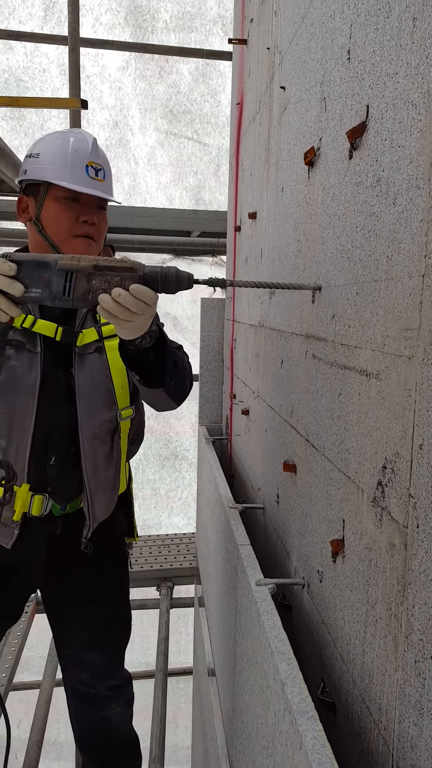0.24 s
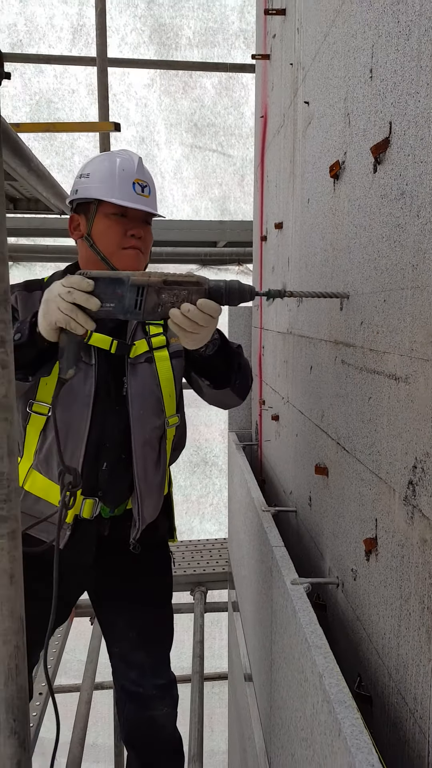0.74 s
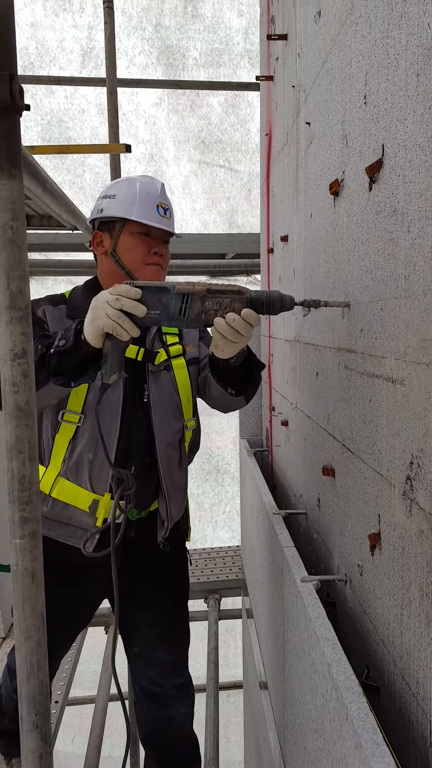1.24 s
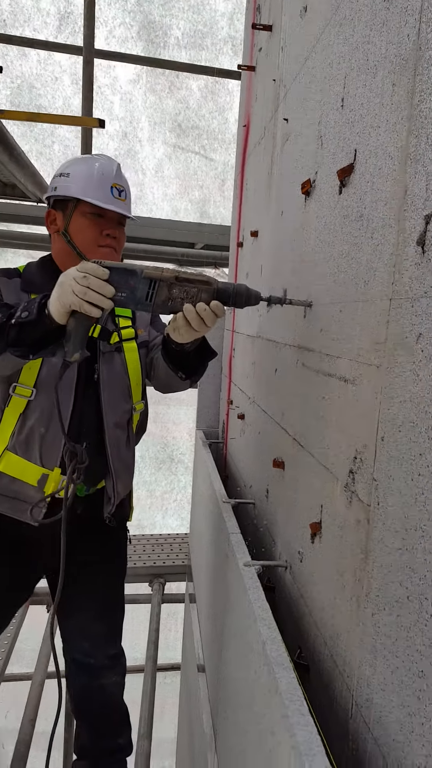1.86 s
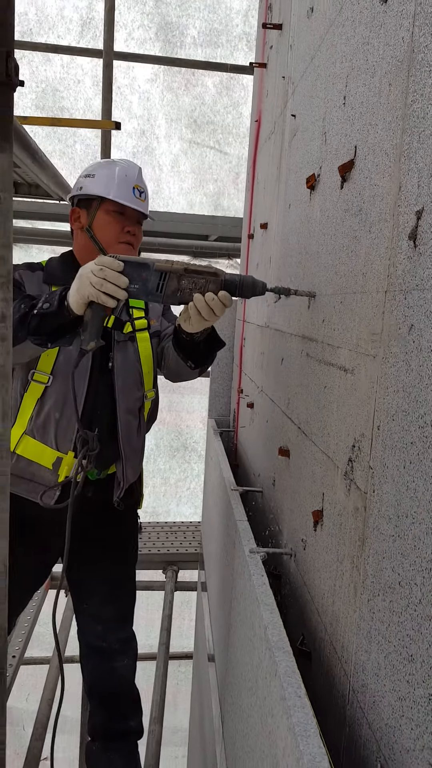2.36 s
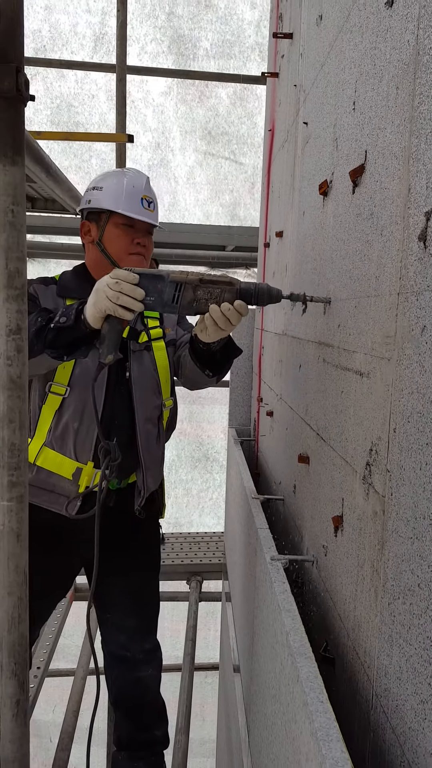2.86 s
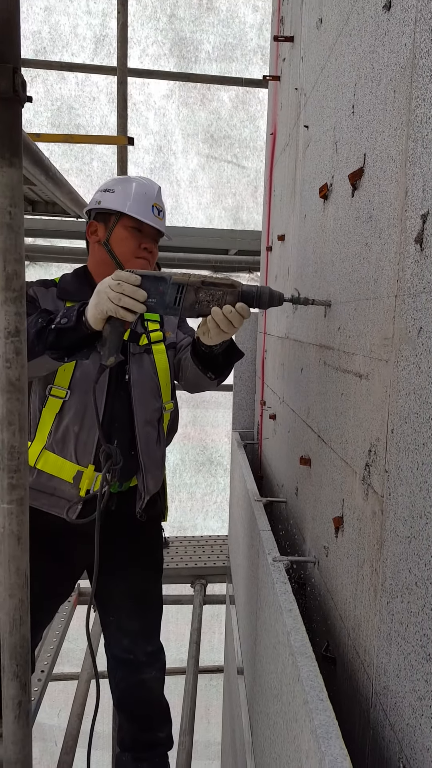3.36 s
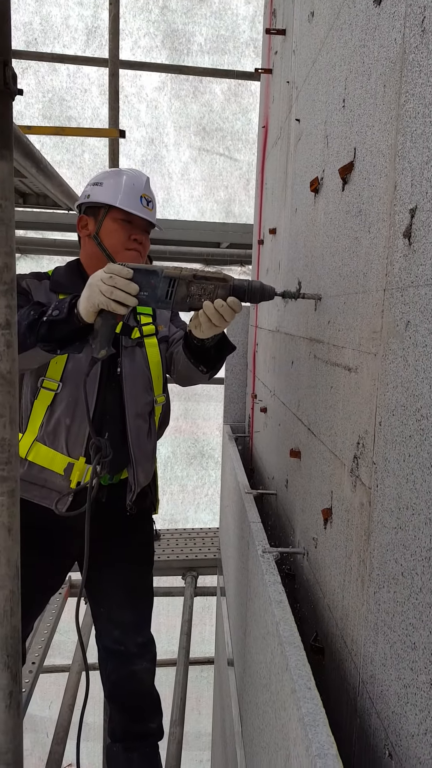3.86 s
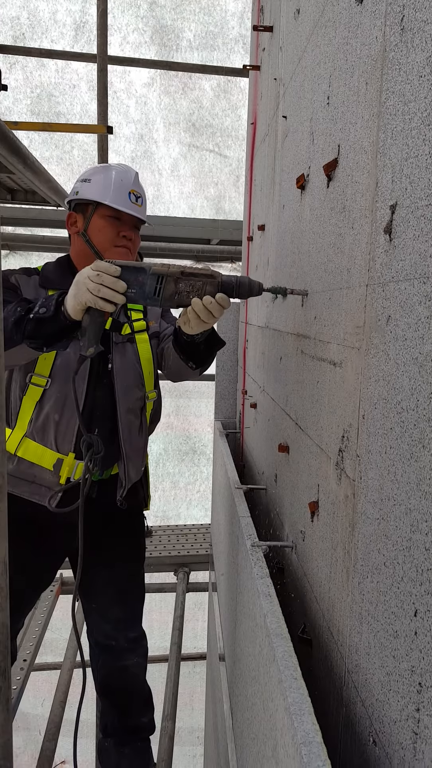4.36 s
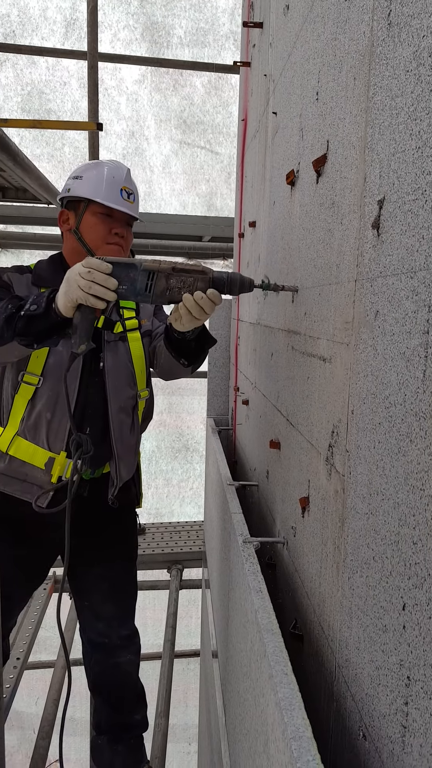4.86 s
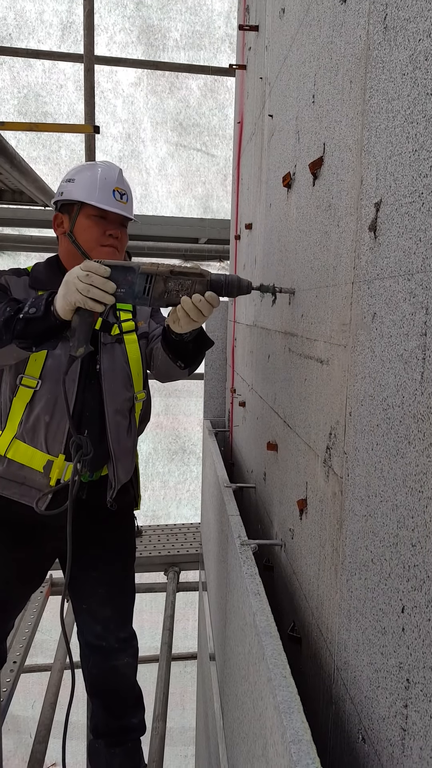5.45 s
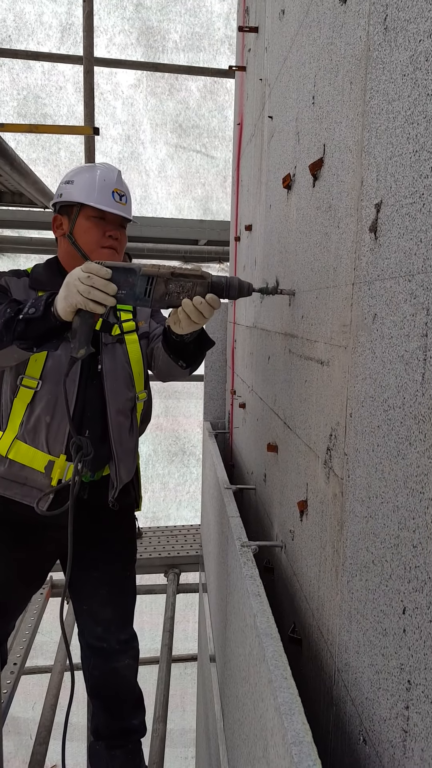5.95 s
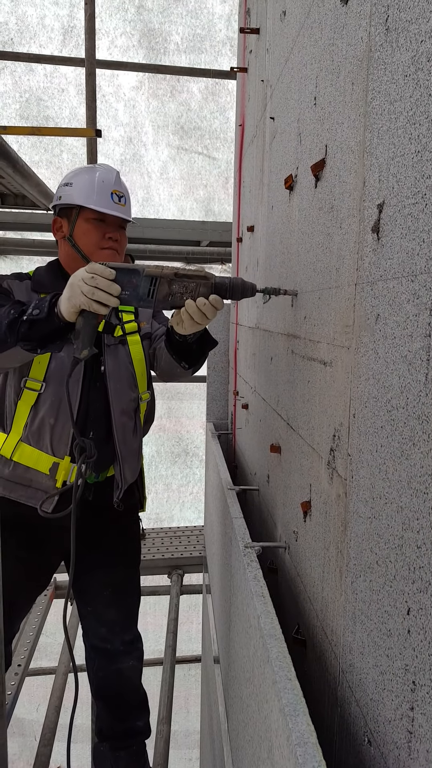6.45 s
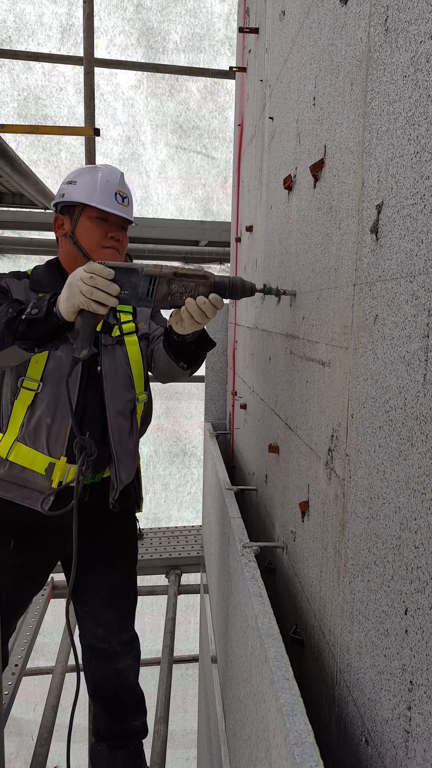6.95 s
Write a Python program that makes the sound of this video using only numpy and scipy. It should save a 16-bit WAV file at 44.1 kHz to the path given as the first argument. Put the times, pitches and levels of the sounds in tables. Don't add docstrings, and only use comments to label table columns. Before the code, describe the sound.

On a building scaffold, a phone two metres off picks up nonstop hammer drilling in stereo. First a hollow, midrange housing rattle while the bit passes through foam, then a short high squeal and a jump to a sharp, hissing, ringing hammer against stone. The rate slows, settles and deepens slightly. Wooden boards knock within the noise, faint wind puffs pass, and steel squeaks near the end.

```python
import sys
import numpy as np
from scipy import signal
from scipy.fft import rfft, irfft, next_fast_len
from scipy.io import wavfile
from scipy.ndimage import uniform_filter1d

SR = 44100
rng = np.random.default_rng(int(sys.argv[2]) if len(sys.argv) > 2 else 0)


def linear_from_db(decibels):
    return 10 ** (np.asarray(decibels, float) / 20)


def dump_mix(stems):
    frames = np.atleast_2d(stems).T
    limited = np.clip(frames, -1, 1)
    pcm = np.round(limited * 32767).astype(np.int16)
    wavfile.write(sys.argv[1], SR, pcm)


N = 317961
T, M = np.arange(N) / SR, next_fast_len(N)
F = np.arange(M // 2 + 1) * SR / M
PORT_LAG = 7


def curves(table):
    s, *columns = np.transpose(table)
    return [np.interp(T, s, c) for c in columns]


def unit(x):
    return x / np.sqrt(np.mean(x ** 2))


def walk(rate):
    k = int(SR / rate)
    held = np.repeat(rng.standard_normal(N // k + 1), k)
    return 1.3 * uniform_filter1d(uniform_filter1d(held, k), k)[:N]


def band(lo_hz, hi_hz, edge_hz=180):
    share = (np.tanh((F - lo_hz) / edge_hz) - np.tanh((F - hi_hz) / edge_hz)) / 2
    if lo_hz == 0:
        share = share + (1 - np.tanh(F / edge_hz)) / 2
    return share


def colour(pair):
    gains = []
    for table in pair:
        hz, db = np.transpose(table)
        gains.append(linear_from_db(np.interp(np.log(F + 1), np.log(hz), db)))
    return np.array(gains)


def resonances(modes):
    gain = 1
    for hz, width, left_db, right_db in modes:
        peak = linear_from_db(np.array([[left_db], [right_db]])) - 1
        gain = gain * (1 + peak / (1 + (2 * (F - hz) / width) ** 2))
    return gain


def ports(shared, likeness, own):
    both = np.array([shared, np.roll(shared, PORT_LAG)])
    return np.sqrt(likeness) * both + np.sqrt(1 - likeness) * own


TOUCH_S, STONE_S = (0.93, 1.16), (1.23, 1.273)
SETTLE_S, DEEP_S = (1.74, 2.56), (3.24, 4.16)


def stages(values):
    return np.interp(T, TOUCH_S + STONE_S + SETTLE_S + DEEP_S, np.repeat(values, 2)[1:-1])


# t/s, f/Hz
BLOW_RATE = [(0, 83.4), (.5, 82.5), (.75, 81.6), (.95, 79.5), (1.25, 77.4), (1.38, 74.4), (1.5, 71.2),
             (1.63, 70.3), (2, 69.2), (2.5, 69.5), (3.25, 69.3), (3.75, 68.4), (4.2, 67.7), (4.6, 68.3),
             (5.1, 67.9), (5.75, 68.2), (6.1, 67.7), (7.21, 67.8)]


def piston():
    rate, = curves(BLOW_RATE)
    return np.cumsum(rate * (1 + .002 * walk(25))) / SR + .33


def blows(turns, rebounds, decay, rise_s=.0005):
    size = linear_from_db(rng.standard_normal((int(turns[-1]) + 2, 3)))
    power = 0
    for k, (late, share) in enumerate(zip((0, 0.23, 0.5), (1, *rebounds))):
        p = turns + 1 - late
        power = power + share * size[p.astype(int), k] * np.exp(-(p % 1) / decay)
    power = uniform_filter1d(power, size=max(int(rise_s * SR), 1))
    return power / uniform_filter1d(power, size=4000)


# from t/s, to t/s, from f/Hz, to
# f/Hz, width f/Hz, left level/dB, right level/dB
SLIDES = [(-0.3, 0.55, 5000, 4800, 400, 1.5, 4.5), (0.3, 1.4, 4300, 4450, 450, 0, 4),
          (-.1, 0.18, 3200, 2900, 200, 4, -4), (0.7, 1.05, 1750, 1800, 250, 2, 1.5),
          (-0.5, 1.3, 2700, 2400, 300, 6, 4.5), (0, 0.42, 2200, 1900, 680, -1.5, -5),
          (4.5, 1.85, 6200, 6200, 630, 12, 12), (1.3, 2.6, 6250, 6600, 450, 4.5, 1),
          (-3, 7.3, 8600, 8250, 350, 4.5, 2.5), (0.8, 7.3, 9150, 8600, 220, -2, -3),
          (1.3, 2.0, 13300, 15500, 900, 4, 0), (1, 1.62, 2600, 2900, 450, -6, -9),
          (5, 5.2, 4200, 3800, 1300, -2, -1), (6, 7.3, 354, 410, 99, 3.5, 1.5),
          (1.3, 1.26, 900, 1300, 260, -6, -6), (3.5, 4.2, 7200, 7500, 310, 2, 4),
          (2.5, 3.35, 6550, 6700, 500, 5, 4), (4.5, 6.15, 6500, 6250, 700, -5, -4),
          (1.5, 6.5, 3900, 3920, 470, -2, -2), (1.2, 7.3, 3160, 3270, 250, 2, 1.5),
          (3.5, 7.3, 830, 800, 120, -2.5, -2), (1.7, 3.1, 160, 200, 110, -3.5, -3),
          (1.6, 3.7, 6900, 6800, 320, -6, -8), (2.5, 3.95, 6900, 6700, 460, -4, -6),
          (2, 3.1, 11400, 11000, 400, 4, -1), (1, 2.6, 14000, 14700, 1500, 5, 4),
          (5, 6.45, 5600, 6100, 790, 8, 2)]
SLIDE_FADE_S = 0.078
PATCH_DB, PATCH_HZ, PATCH_S, PATCH_TOP_HZ = 1.5, 500, .03, 6200


def patches(hz, s):
    db = 0
    for a, b, from_hz, to_hz, width, left_db, right_db in SLIDES:
        fade = np.clip(np.minimum(s - a, b - s) / SLIDE_FADE_S, 0, 1)
        centre = np.interp(s, [a, b], [from_hz, to_hz])
        bump = fade / (1 + (2 * (hz - centre) / width) ** 2)
        db = db + np.array([left_db, right_db])[:, None, None] * bump
    mottle = rng.standard_normal((len(hz), len(s)))
    tall = max(int(PATCH_HZ / hz[1, 0]), 1)
    wide = max(int(PATCH_S / (s[1] - s[0])), 1)
    for _ in range(2):
        mottle = uniform_filter1d(uniform_filter1d(mottle, tall, axis=0), wide, axis=1)
    return db + PATCH_DB * unit(mottle) * np.clip(PATCH_TOP_HZ / (hz + 1), 0, 1) ** 2


# t/s, top f/Hz, half length t/s
SWAYS = [(1.56, 11000, 0.38), (1.8, 9700, .2), (1.993, 10400, 0.18), (2.192, 9860, 0.12),
         (2.9, 10060, 0.32), (3.094, 9600, 0.13), (3.25, 9500, .15), (3.367, 9560, 0.15), (3.66, 9200, .14),
         (4.004, 9000, 0.1), (4.12, 9700, 0.11), (4.8, 9000, 0.35), (5.3, 8700, 0.4), (5.687, 8870, 0.43),
         (6.227, 9600, 0.15), (6.46, 9300, 0.25), (6.722, 9600, 0.15), (7.04, 9230, .22)]
REST_EDGE_HZ, EDGE_HZ = 8460, 44
# f/Hz, level/dB
LEFT_LOSS = [(8100, -0.5), (8600, -7), (9200, -5.5), (9800, -6.5), (10150, -8), (10400, -4), (11000, -5)]
RIGHT_LIFT_DB, LIFT_FADE_HZ, LIFT_TOP_HZ = 13.5, 750, 5520
TIP_HZ, TIP_DB = 11900, (-0.5, 1.5, 1.5, 0)


def steer(x):
    hz, s, z = signal.stft(x, SR, nperseg=512, noverlap=384)
    hz = hz[:, None]
    lifts = [(top_hz - REST_EDGE_HZ) * np.clip(1 - ((s - at) / half) ** 2, 0, 1) for at, top_hz, half in SWAYS]
    edge = REST_EDGE_HZ + np.max(lifts, axis=0)
    under = (1 - np.tanh((hz - edge) / EDGE_HZ)) / 2
    ridge = (np.tanh((hz - edge / 2) / EDGE_HZ) - np.tanh((hz - LIFT_TOP_HZ) / 150)) / 2
    ridge = ridge * np.exp(-np.abs(hz - edge / 2) / LIFT_FADE_HZ)
    loss_db = np.interp(hz, *np.transpose(LEFT_LOSS)) * under
    db = np.array([loss_db, RIGHT_LIFT_DB * np.clip(ridge, 0, 1)])
    db = db + (1 + np.tanh((hz - TIP_HZ) / 400)) / 2 * np.interp(s, SETTLE_S + DEEP_S, TIP_DB)
    z = z * linear_from_db(db * np.interp(s, STONE_S, [0, 1]) + patches(hz, s))
    return signal.istft(z, SR, nperseg=512, noverlap=384)[1][:, :N]


# f/Hz, level/dB
FOAM = [
    [(40, -23), (351, -6), (470, -7), (970, -9), (1500, 5), (2400, -3), (2800, 5), (3900, -4), (4700, -2), (7200, -9), (9900, -2), (10800, -11), (13500, -11), (15000, -25.1)],
    [(40, -27), (304, -9.5), (351, -2.5), (470, -9), (726, -3), (970, -15.5), (1800, 8.5), (3200, -6.5), (4600, 6.5), (5900, -12), (6800, -28), (7800, -10), (9200, -30), (10200, -46), (10800, -25), (11300, -19), (12900, -11.5), (15000, -15.5)],
]
TOUCH = [
    [(40, -40), (147, -30), (351, 5), (970, -21), (1600, 3.5), (2600, -3.5), (3100, -11), (6900, -14), (7800, -9), (8400, -1), (10800, -14), (11700, -10), (14300, -13), (15000, -18)],
    [(40, -62), (127, -29), (351, -1), (726, -3), (970, -25), (1600, 4.5), (2600, -2.5), (3200, -15), (4400, -4.5), (6000, -21), (6900, -42), (8300, -11), (8900, -50), (10500, -52), (11100, -10), (11600, -16), (15000, -12)],
]
STONE = [
    [(40, -36), (53, -26), (110, -8.5), (351, -2.5), (2500, -0.2), (3100, -9.5), (4800, -7), (6100, -21), (8000, -8.5), (9900, 8), (10150, 1), (10400, -3), (11500, -0.5), (12300, -4), (13300, -8), (13900, -13), (14500, -3.5), (15000, -14)],
    [(40, -44), (82, -10), (127, -15.5), (227, -7), (406, -1), (839, -2.5), (2500, 0), (3200, -9.5), (4600, -11), (6100, -19.5), (8000, -8.5), (12500, -2.5), (14400, -11), (15000, -10.5)],
]
# f/Hz, width
# f/Hz, left level/dB, right level/dB
STONE_MODES = [(9600, 760, 7, 3.5), (10000, 180, -1.5, 4), (9750, 100, -2, 11), (8860, 80, 7, 5),
               (1730, 130, 2.5, 3), (9000, 150, 3, 7.5), (7900, 100, 8.5, 9), (10900, 160, 1, 4),
               (12250, 160, 4.5, 2.5), (14340, 300, 3, 7), (4530, 250, -3, 2.5), (576, 38, 4.5, 0),
               (2460, 530, 7.5, 6.5)]
SHELL = [(1560, 200, 3.5, 2.5), (2055, 230, -2, -7.5), (2734, 37, 8, 9), (2150, 150, 5.5, 8),
         (1760, 170, 3, 1), (895, 160, 2, 0)]
# low f/Hz, high f/Hz, steady share in foam, touch and stone,
# decay [cycles], repeating share, likeness of the ports
PARTS = [
    (0, 1360, 0.44, 0.35, 0.39, 0.34, 0.026, 0.24),
    (1103, 3570, 0.04, 0.3, 0.33, 0.3, 0.093, 0.61),
    (3080, 7330, 0.06, 0.66, 0.36, 0.37, 0.047, 0.47),
    (6230, 17000, 0.36, 0.089, 0.19, 0.24, 0.089, 0.38),
    (9030, 10110, 0.31, 0.41, 0.11, 0.14, 0.92, 0.23),
]
# level/dB in foam, touch, first stone, seated, deep
PART_DB = [(-29.5, -32, -27.5, -27.5, -28), (-20.5, -24, -23.5, -24.5, -26.5),
           (-25.5, -26, -29.5, -27.5, -29), (-33.5, -27.5, -24.5, -24.5, -24.5),
           (-35, -31.5, -26.5, -24.5, -24)]
# strength of first and second rebound, rise of the blow t/s
ECHO = [(.25, .15, .002), (.3, 0.14, 0.0029), (.4, .3, 0.00071), (.4, .4, 0.00055), (.7, 1.1, .0005)]
# t/s, level/dB
PUSH = [(0.0, -13), (0.02, -16), (0.36, -17.5), (0.54, -17), (1.26, -17.5), (1.32, -14), (1.44, -17),
        (2.75, -19), (2.91, -19.5), (3.45, -19), (3.57, -20.5), (4.18, -18.5), (6.89, -20), (7.21, -16)]
USUAL_PUSH_DB = -18
PUSH_SHARE = (0.4, 0.4, 0.85, 0.37, 0.6)
FLICKER_DB = (.9, 1.3, .5, .9, 1.2)
UNEVEN = (0.46, 0.52, 0.42, 0.7, 0.85)
REBOUND = (.15, .3, .35, .5, .8)


def drill(turns):
    touch = np.interp(T, TOUCH_S, [0, 1])
    rebound = stages(REBOUND)
    shank = band(*PARTS[4][:2])
    push_db = curves(PUSH)[0] - USUAL_PUSH_DB
    since = (turns % 1 / np.gradient(turns)).astype(int) % 1024
    gains = colour(FOAM) * resonances(SHELL), colour(TOUCH) * resonances(SHELL), colour(STONE) * resonances(STONE_MODES)
    out = 0
    for k, (level_db, (lo, hi, *steady, decay, same, like)) in enumerate(zip(PART_DB, PARTS)):
        stone = np.interp(T, SETTLE_S if k == 1 else STONE_S, [0, 1])
        shares = 1 - touch, touch - stone, stone
        mask = band(lo, hi)
        metered = mask
        if k == 3:
            mask = mask * (1 - shank)
            metered = mask * (1 - band(0, 10940))
        first, second, rise_s = ECHO[k]
        power = blows(turns, [rebound * first, rebound * second], decay, rise_s)
        repeating = rng.standard_normal((3, 1024))[:, since]
        rattle = np.sqrt(same) * repeating + np.sqrt(1 - same) * rng.standard_normal((3, N))
        rattle = ports(rattle[0], like, rattle[1:])
        part = 0
        for share, calm, gain in zip(shares, steady, gains):
            shaped = rfft(rattle * np.sqrt(calm + (1 - calm) * power), M) * gain
            meter = np.sqrt(2 * np.sum(np.abs(shaped.mean(axis=0)) ** 2 * metered) / N / M)
            part = part + np.sqrt(share) * irfft(shaped * np.sqrt(mask), M)[:, :N] / meter
        part = part / np.sum(np.sqrt(shares), axis=0)
        flicker_db = FLICKER_DB[k] * walk(14) * stages(UNEVEN)
        out = out + part * linear_from_db(stages(level_db) + PUSH_SHARE[k] * push_db + flicker_db)
    return steer(signal.sosfilt(signal.butter(2, 110, "highpass", fs=SR, output="sos"), out))


# f [multiple of the blow rate], level/dB
FREE = [(2, -24), (3, -15), (4, -14), (7, -15), (8, -11), (11, -30), (12, -22), (13, -13), (15, -6.5),
        (17, -9), (18, -11), (19, -4), (20, -17), (22, -9), (23, -8), (26, -10)]
SHALLOW = [(2, -15), (4, -7), (5, -5.5), (6, -0.5), (8, 1.5), (9, -5), (11, -11), (12, -7.5), (13, -10),
           (15, -5.5), (16, -7.5), (18, -7), (19, -16), (20, -7.5), (21, -18), (22, -3), (23, -23),
           (24, -3), (25, -5), (26, -3), (27, -5), (28, -1)]
DEEP = [(2, -11.5), (3, -22), (4, -9.5), (5, -6), (6, -2), (8, -6), (9, -7.5), (13, -12), (14, -6),
        (15, -6), (16, -6), (17, -14), (19, -6.5), (20, -8.5), (22, -10.5), (25, -1), (27, -8)]
OPPOSED, OPPOSED_RAD = (5, 6, 13, 25, 27), 2.4
GEAR_RATIO, SLOT_ORDER = 4.71, 20
COMB_DB = (-24, -30, -25.5, -24, -24)
ARMATURE_DB, OCTAVE_DB = (-38.5, -41, -39, -38, -46.5), (-40.5, -38.5, -44.5, -39, -39)
SLOT_DB = (-40.5, -50, -56, -65, -65)


def hum(turns):
    stone, deep = np.interp(T, STONE_S, [0, 1]), np.interp(T, DEEP_S, [0, 1])
    comb_db = stages(COMB_DB)
    out, wander = np.zeros((2, N)), 0.046 * walk(12)
    for table, share, opposed in ((FREE, 1 - stone, ()), (SHALLOW, stone - deep, ()), (DEEP, deep, OPPOSED)):
        for k, db in table:
            lag = 0.065 * k + OPPOSED_RAD * (k in opposed) + 0.22 * rng.standard_normal()
            phase = 2 * np.pi * k * turns - 0.0493 * k * k + k * (wander + 0.048 * walk(12))
            level = share * linear_from_db(db + 1.7 * walk(9) + comb_db - 5.5)
            out += level * np.cos(phase - np.array([[0], [lag]]))
    for k, db in ((1, ARMATURE_DB), (2, OCTAVE_DB), (SLOT_ORDER, SLOT_DB)):
        level = np.sqrt(2) * linear_from_db(stages(db) + 1.5 * walk(4))
        out += level * np.sin(2 * np.pi * k * GEAR_RATIO * turns)
    return out


# t/s, peak level/dB, fade t/s
GUSTS = [(.02, -62, .05), (.21, -52, 0.027), (.28, -57, .02), (.36, -40, 0.1), (.46, -45, .05),
         (.55, -54, .03), (.61, -52.5, .02), (.68, -54, .02), (1.05, -53, .02), (1.28, -60, 0.047),
         (1.47, -63, 0.037), (1.6, -57, 0.036), (1.75, -61, 0.025), (1.92, -65, .04), (2.0, -64, .05),
         (2.24, -56, .05), (2.88, -67, .05), (3.36, -52, 0.07), (3.55, -60, 0.27), (4.48, -51, 0.09),
         (4.66, -52, .08), (5.05, -54, .16), (5.97, -53, 0.11), (6.25, -45, 0.035), (7.0, -61, .2)]
GUST_RISE_S, CALM_DB = 0.0094, -79


def wind():
    air = rng.standard_normal((3, N))
    low_pass = signal.butter(2, [22, 200], "bandpass", fs=SR, output="sos")
    low = signal.sosfilt(low_pass, ports(air[0], 0.67, air[1:]))
    puffs = linear_from_db(CALM_DB)
    for s, db, fade_s in GUSTS:
        puffs = puffs + linear_from_db(db) * np.exp(np.minimum((T - s) / GUST_RISE_S, (s - T) / fade_s))
    return unit(low) * puffs * linear_from_db(5.0 * walk(25.9) + np.array([[9], [7]]))


# t/s, f/Hz, level/dB
SQUEAL = [
    (.99, 8350, -60),
    (1.0, 8350, -32),
    (1.065, 8260, -21.5),
    (1.094, 8290, -43),
    (1.105, 8320, -27),
    (1.2, 8450, -33),
    (1.3, 8500, -28.5),
    (1.39, 8600, -31),
    (1.45, 8600, -56),
]
SQUEAL_WIDTH_HZ = 170


def squeal(turns):
    hz, db = curves(SQUEAL)
    slow_pass = signal.butter(2, SQUEAL_WIDTH_HZ / 2, fs=SR, output="sos")
    slow = signal.sosfilt(slow_pass, rng.standard_normal((2, N)))
    phase = 2 * np.pi * np.cumsum(hz) / SR
    tone = unit(slow[0] * np.cos(phase) + slow[1] * np.sin(phase))
    tone = tone * np.sqrt(0.14 + blows(turns, (.2, .04), 0.18)) * linear_from_db(db)
    return np.array([tone * linear_from_db(8.5), np.roll(tone, PORT_LAG) * linear_from_db(-5.0)])


def rings(events, modes, rise_s, wobble):
    out, t = np.zeros(N + SR), np.arange(SR // 2) / SR
    for s, db, hz in events:
        bend = 1 + wobble * unit(uniform_filter1d(rng.standard_normal(len(t)), size=40))
        for ratio, mode_db, t60 in modes:
            tone = np.sin(2 * np.pi * np.cumsum(hz * ratio * bend) / SR)
            envelope = np.exp(-np.log(1000) * t / t60) * (1 - np.exp(-t / rise_s))
            out[int(s * SR):][:len(t)] += linear_from_db(db + mode_db) * tone * envelope
    return np.array([out[:N], np.roll(out[:N], PORT_LAG)])


# t/s, peak level/dB, f/Hz
KNOCKS = [(1.321, -4.5, 558), (1.394, -10, 550), (2.095, -22, 564), (2.397, -14, 566), (2.471, -13.5, 550),
          (2.671, -27, 566), (2.731, -20, 550), (3.104, -19, 570), (2.991, -15, 331), (3.406, -8, 547),
          (3.64, -22, 546), (3.698, -18, 558), (3.759, -11, 555), (3.85, -14, 559), (4.155, -14, 622),
          (4.21, -14.5, 589), (4.386, -16.5, 581), (3.797, -13.5, 550), (4.084, -11, 559),
          (4.913, -17.5, 615), (5.504, -23, 623), (5.767, -32, 620), (5.885, -9.5, 548), (5.93, -15, 563),
          (5.96, -16, 601), (6.03, -17, 573), (6.69, -15.5, 555), (6.8, -21, 550), (7.096, -18, 598)]


def knocks():
    modes = [(1, -6.5, 0.26), (1.1, -12.5, 0.1), (1.19, -10, 0.074), (0.69, -11.0, 0.11), (2.9, -11.0, 0.091)]
    return rings(KNOCKS, modes, 0.0009, 0.059)


# t/s, peak level/dB, f/Hz
SQUEAKS = [(5.9999, -14, 7900), (6.1916, -14, 7900), (6.2382, -11, 7900), (6.3265, -9, 8000),
           (6.4608, -12, 7900), (6.6987, -19, 7470), (7.0419, -22, 7730), (7.1467, -16, 7450)]


def squeaks():
    return rings(SQUEAKS, [(0.99, -0.5, 0.11), (1.02, -5, .06)], 0.002, 0.023)


def scene():
    turns = piston()
    return drill(turns) + hum(turns) + wind() + squeal(turns) + knocks() + squeaks()


def top_cut(x):
    return signal.sosfilt(signal.butter(12, 15230, fs=SR, output="sos"), x)


def record(dry):
    x = signal.sosfilt(signal.butter(2, 65, "highpass", fs=SR, output="sos"), dry)
    x = np.tanh(1.05 * x) / 1.05
    x = signal.sosfilt(signal.ellip(10, .2, 60, 15200, fs=SR, output="sos"), x)
    return top_cut(x)


dry = scene()
out = record(dry)
dump_mix(out)
```